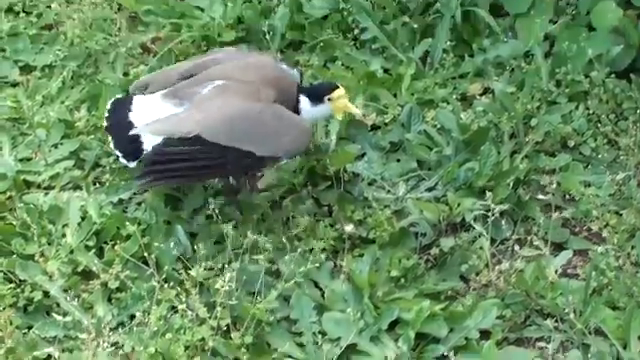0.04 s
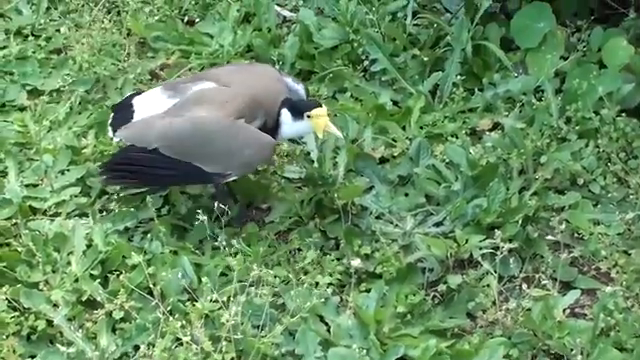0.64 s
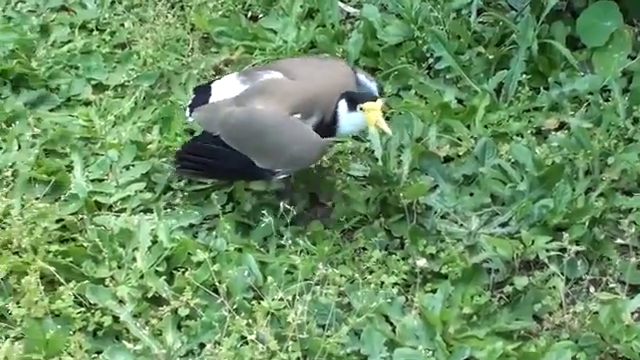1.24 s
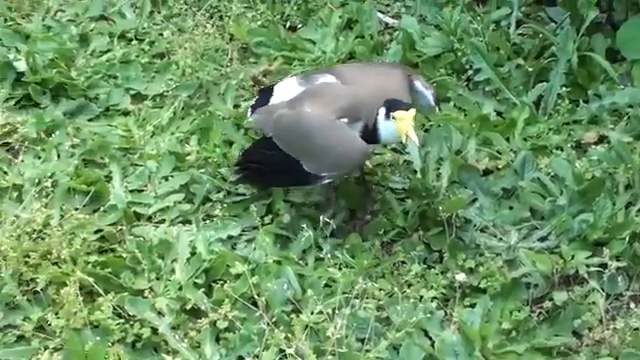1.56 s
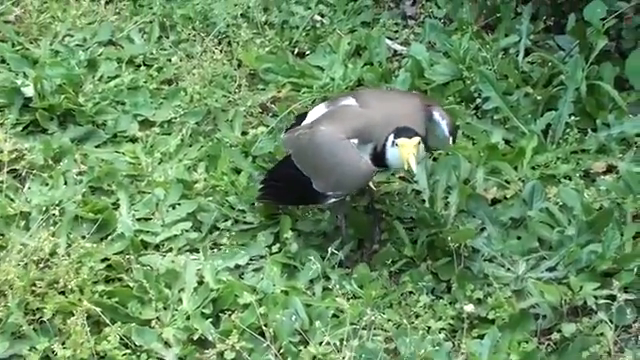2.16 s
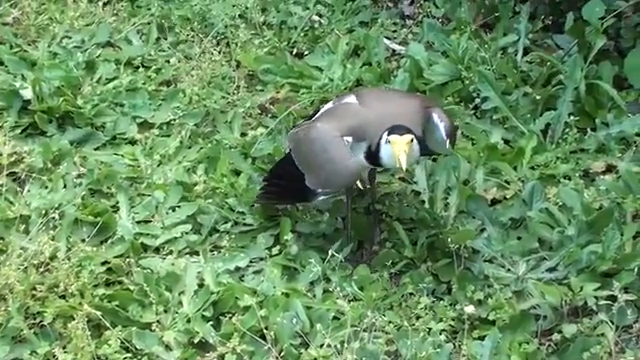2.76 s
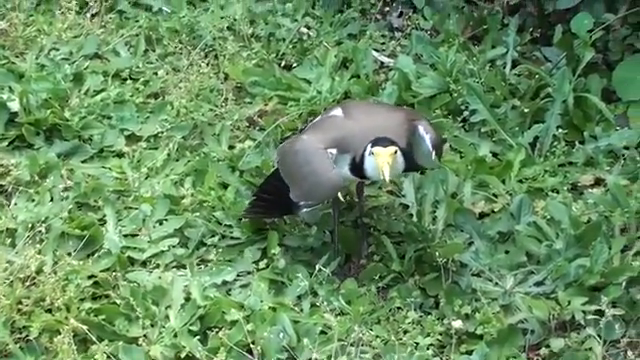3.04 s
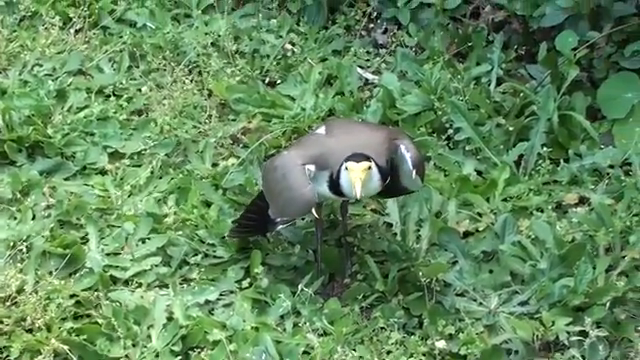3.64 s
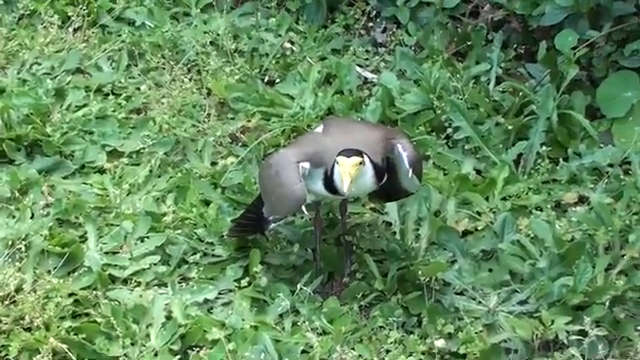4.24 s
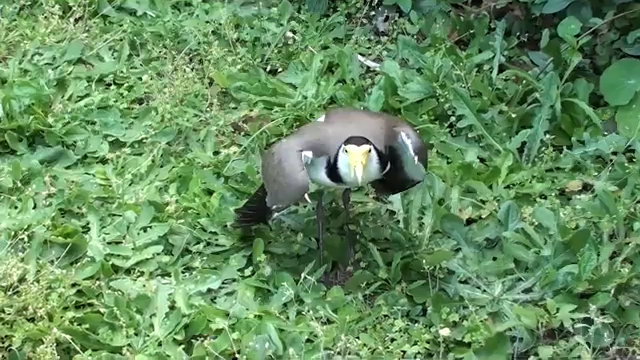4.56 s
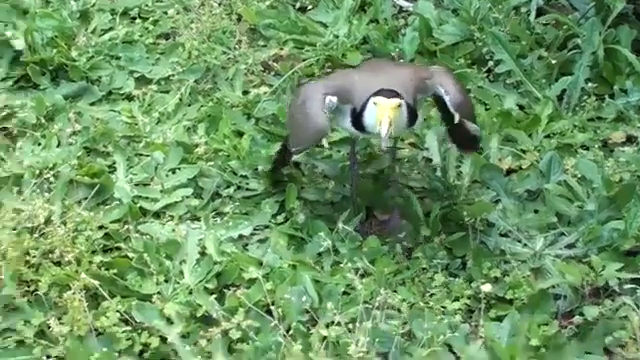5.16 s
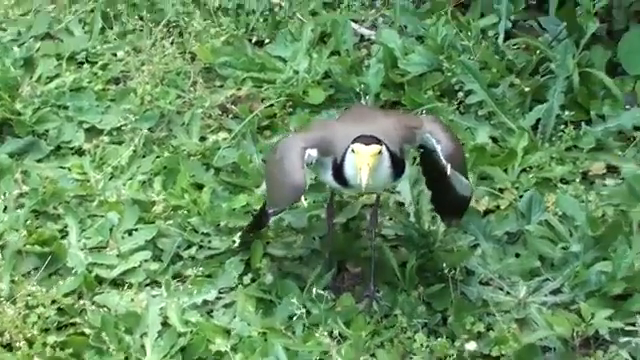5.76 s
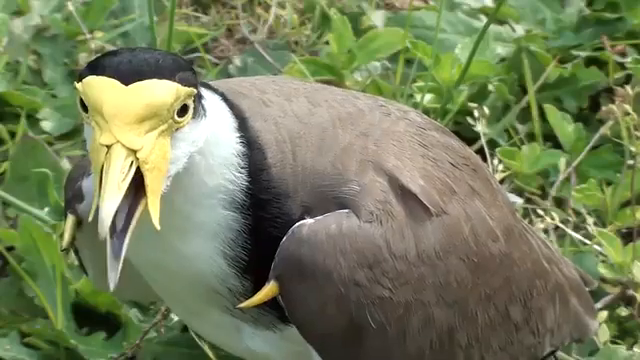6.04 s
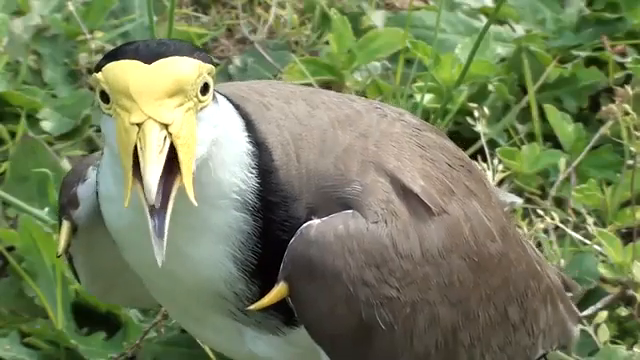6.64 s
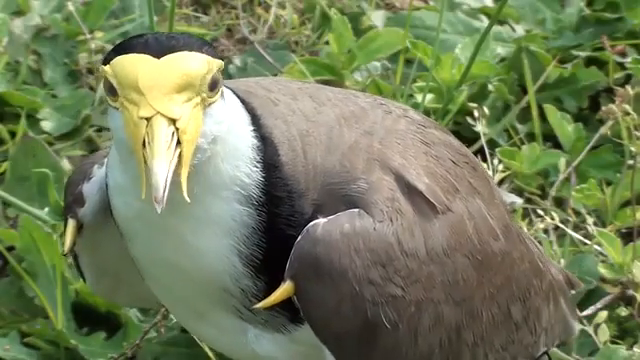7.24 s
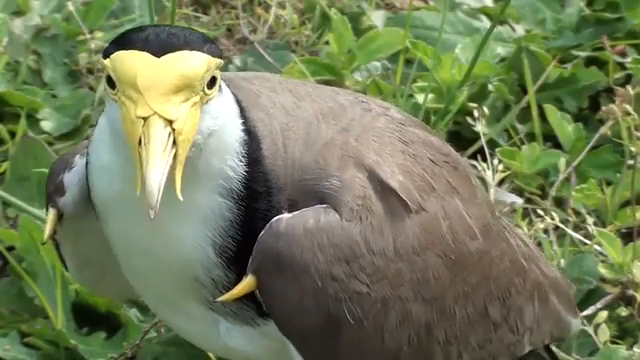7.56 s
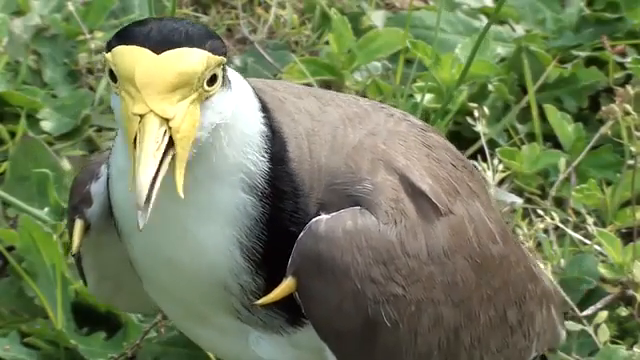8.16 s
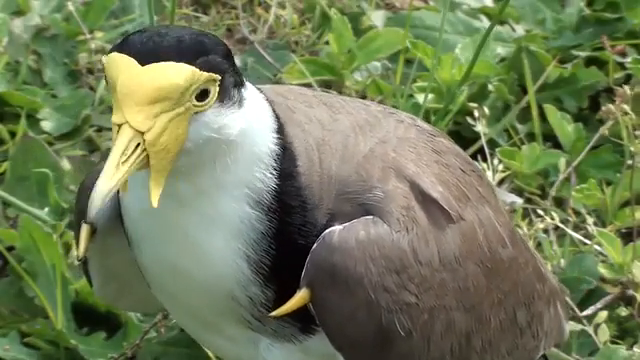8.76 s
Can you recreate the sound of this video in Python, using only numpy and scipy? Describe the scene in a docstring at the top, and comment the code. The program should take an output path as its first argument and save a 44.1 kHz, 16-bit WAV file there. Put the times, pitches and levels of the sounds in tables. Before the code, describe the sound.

A quiet garden hisses softly, with far insects and small birds whistling in the distance. A camera ticks faintly as it focuses, then its zoom motor whirs and leaves rustle. About halfway, a lapwing close to the microphone gives four loud, quick, harsh calls, followed by seven longer ones at uneven gaps. Each echoes briefly, and light puffs of air rumble on the microphone toward the end.

```python
"""A garden: the air hisses and rumbles, far insects buzz, and a camera whines and ticks as it focuses.
Small birds whistle far off. After 3.3 s the zoom motor takes over from the ticking, then leaves rustle.
At 4.7 s a masked lapwing close by on the lawn scolds four times quickly, and from 6.1 s seven times
at more length, while puffs of air hit the microphone. Each call starts with a creak, stutters as
the voice catches, and ends on a clear held note that echoes from the garden."""
import sys
import numpy as np
from scipy import signal
from scipy.fft import rfft, irfft, next_fast_len
from scipy.io import wavfile

SR = 44100
rng = np.random.default_rng(int(sys.argv[2]) if len(sys.argv) > 2 else 0)


def wav_record(signal):
    """Record a signal, one row per channel, as 16-bit PCM in the file named by sys.argv[1]."""
    frames = np.transpose(np.atleast_2d(signal))
    bounded = np.clip(frames, -1, 1)
    # unit amplitude maps onto the largest positive 16-bit level
    quanta = np.round(bounded * 32767).astype(np.int16)
    wavfile.write(sys.argv[1], SR, quanta)


N = 387638
TIME = np.arange(N) / SR
CALL_SIZE = 8192   # samples set aside for one call


def from_db(db):
    """Turn decibels into a number to multiply a sound by."""
    return 10 ** (np.asarray(db) / 20)


def rms(x):
    """The average strength of a sound (root mean square)."""
    return np.sqrt(np.mean(x ** 2) + 1e-20)


def level(rows):
    """A volume curve through rows of (time [s], level [dB])."""
    return from_db(np.interp(TIME, *np.transpose(rows)))


def at_hz(points, hz):
    """Look up a frequency in a table, with octaves evenly spaced."""
    points = np.array(points)
    return np.interp(np.log(np.maximum(hz, 1)), np.log(points[:, 0]), points[:, 1])


def bins(size):
    """The frequencies that rfft splits a sound into."""
    return np.arange(size // 2 + 1) * SR / size


def wander(rate_hz, size):
    """A smooth random wobble of strength 1."""
    x = irfft(rfft(rng.standard_normal(size)) / (1 + (bins(size) / rate_hz) ** 2), size)
    return x / rms(x)


# How alike the two ears' noise is: (frequency [Hz], likeness [0 to 1])
EAR_LIKENESS = [(30, 0.82), (125, 1), (250, 0.83), (600, 0.89), (2000, 0.8), (8000, 1), (15000, 1)]
def stereo_noise(tone):
    """Noise of strength 1, mostly alike in both ears; tone sets the balance of low and high."""
    size = next_fast_len(N)
    hz = bins(size)
    alike = np.clip(at_hz(EAR_LIKENESS, hz), 0, 1)
    mid, side = rfft(rng.standard_normal((2, size))) * from_db(at_hz(tone, hz))
    x = irfft(np.sqrt(1 + alike) * mid + np.sqrt(1 - alike) * side * [[1], [-1]], size)[:, :N]
    return x / rms(x)


# Tone of still air: (frequency [Hz], relative level [dB])
AIR_TONE = [(30, -20.5), (55, -10), (90, 3.5), (130, 3.5), (260, -4.5), (480, -2), (850, -1.5),
            (1100, -5.5), (1250, -9.5), (2500, -14.5), (5000, -17), (8000, -19.5), (11500, -24.5),
            (15800, -25.5)]
# Its loudness: (time [s], level [dB])
AIR_LEVEL = [(0, -46), (4.68, -46), (4.76, -55), (5.25, -54.5), (5.94, -50.5), (5.98, -57), (7.2, -58),
             (7.9, -55), (8.79, -57.5)]
def air_and_whine(whine_hz=14998, whine_db=-22):
    """Still air hisses; the camera's thin whistle rises and falls with it, 22 dB weaker."""
    whine = from_db(whine_db) * np.sqrt(2) * np.sin(2 * np.pi * whine_hz * TIME)
    return level(AIR_LEVEL) * (stereo_noise(AIR_TONE) + whine)


# Tone of air on the microphone: (frequency [Hz], relative level [dB])
RUMBLE_TONE = [(20, -16.5), (50, -5), (90, 4), (160, 0.5), (260, -8.5), (400, -24), (900, -42)]
def rumble():
    """Air rumbles unevenly on the microphone: a faint draught, later joined by puffs."""
    strength = from_db(-67) + gusts()
    return strength * stereo_noise(RUMBLE_TONE) * from_db(3.0 * wander(15, N) - 1.5)


# Tone of far insects: (frequency [Hz], relative level [dB])
INSECT_TONE = [(3500, -45), (4800, -14), (5130, 0), (5450, -14), (7000, -45)]
# Their loudness: (time [s], level [dB])
INSECT_LEVEL = [(0, -67), (3.3, -64.5), (4.7, -68), (4.8, -80), (8.79, -80)]
def insects():
    """Far insects blend into one thin, high buzz."""
    return level(INSECT_LEVEL) * stereo_noise(INSECT_TONE)


# Ringing notes of the lens barrel: (pitch [Hz], kick strength [dB], time to fade by 60 dB [s])
BARREL_NOTES = [(1120, -45.3, .085), (835, -51.5, .07), (765, -51.5, .07)]
def focus_motor(steps_per_s=19.03, stop_s=3.36, uneven_db=1.2):
    """Each step of the lens kicks its barrel, which rings briefly."""
    steps = (np.arange(.03, stop_s, 1 / steps_per_s) * SR).astype(int)
    out, t = np.zeros(N), np.arange(SR // 5) / SR
    for hz, db, fade_s in BARREL_NOTES:
        kicks = np.zeros(N)
        kicks[steps] = from_db(db + uneven_db * rng.standard_normal(len(steps)))
        ring = np.sin(2 * np.pi * hz * t) * from_db(-60 * t / fade_s) * 2 * (1 - np.exp(-t / .0068))
        out += signal.fftconvolve(kicks, ring)[:N]
    return out


def chirp(start, length, db, first_hz, last_hz, warble, flutter_db=3.0):
    """One small bird's sliding note, wobbling in pitch and loudness."""
    out, size, i = np.zeros(N), int(length * SR), int(start * SR)
    hz = np.linspace(first_hz, last_hz, size) * (1 + 2 * warble * wander(120, CALL_SIZE * 4)[:size])
    shape = np.sqrt(np.hanning(size)) * from_db(flutter_db * wander(50, CALL_SIZE * 4)[:size])
    out[i:i + size] = from_db(db) * shape / rms(shape) * np.sin(2 * np.pi * np.cumsum(hz) / SR)
    return out


# One bird's plain, sinking whistles: (time [s], length [s], level [dB])
WHISTLES = [(.34, .12, -58), (1.44, .08, -61), (1.712, .14, -59), (3.218, .077, -55)]
# Another's upward slide, paired with a higher, sinking note:
# (time [s], length [s], level [dB], delay of the high note [s])
NOTE_PAIRS = [(.716, .055, -53, .235), (1.868, .075, -52.5, -.03), (1.966, .078, -53, -.01),
              (2.84, .165, -52.5, -.075), (3.77, .13, -49.5, .05), (5.69, .12, -58, .06)]
def songbirds(twitters=11, twitters_until_s=4.5, echo_db=1.3):
    """Two far birds repeat their notes among faint random twitters, all blurred by echo."""
    out = sum(chirp(start, length, db, 2130, 2040, warble=.003) for start, length, db in WHISTLES)
    for start, length, db, delay in NOTE_PAIRS:
        out += chirp(start, length, db, 3030, 3780, warble=.022)
        out += chirp(start + delay, length, db - 1, 4380, 4220, warble=.015)
    for when, height, slope in rng.random((twitters, 3)):
        first_hz = 2900 * (5000 / 2900) ** height
        last_hz = first_hz * (1 + .05 * (2 * slope - 1))
        out += chirp(when * twitters_until_s, .08, -62, first_hz, last_hz, warble=.012)
    return out + from_db(echo_db) * garden_echo(out)


# Tone of the garden's echo: (frequency [Hz], relative level [dB])
ECHO_TONE = [(500, -16), (1100, -11), (2100, 0.5), (2650, -3), (3200, -1.5), (4300, -1), (5400, 1),
             (6500, 1), (8000, -4), (11000, -10), (16000, -17.5)]
# How long it lasts: (frequency [Hz], time to fade by 60 dB [s])
ECHO_FADE = [(500, .25), (1100, .3), (2100, 0.69), (3100, 0.53), (7000, 0.51), (14000, 0.31)]
def garden_echo(x, width=.2, early_db=5.0, early_s=.042):
    """Sound bounces off ground, shrubs and fences; the middle pitches linger longest."""
    t = np.arange(SR) / SR
    noise, echo = rfft(rng.standard_normal((2, SR))), 0
    edges = np.geomspace(300, 17000, 13)
    for low, high in zip(edges, edges[1:]):
        hz = np.sqrt(low * high)
        band = irfft(noise * ((bins(SR) >= low) & (bins(SR) < high)), SR)
        echo = echo + band * from_db(at_hz(ECHO_TONE, hz) - 60 * t / at_hz(ECHO_FADE, hz))
    echo = echo * np.clip(t / .0084, 0, 1) * from_db(early_db * np.exp(-t / early_s)) / np.sqrt(.06 * SR)
    mid, side = signal.fftconvolve(x[None], echo, axes=1)[:, :N]
    return mid + width * side * np.array([[1], [-1]])


# Tone of the zoom motor: (frequency [Hz], relative level [dB])
ZOOM_TONE = [(200, -26), (600, -11.5), (850, 0.5), (1150, 0), (1700, -5), (2200, -7.5), (3200, -8),
             (4600, -13), (6000, -24), (9000, -28.5), (15000, -44.5)]
# Its loudness: (time [s], level [dB])
ZOOM_LEVEL = [(0, -100), (3.33, -100), (3.39, -43), (4.68, -43), (4.76, -50.5), (5.3, -52), (5.94, -49),
              (5.99, -100), (8.79, -100)]
def zoom_motor():
    """The camera's zoom motor whirs faintly, with a slight flutter."""
    return level(ZOOM_LEVEL) * stereo_noise(ZOOM_TONE) * from_db(wander(60, N))


# Tone of leaves: (frequency [Hz], relative level [dB])
LEAF_TONE = [(500, -20.5), (1500, 3), (4000, -3), (8000, -2.5), (11000, -14), (16000, -24.5)]
# Each rustle: (time [s], length [s], level [dB])
RUSTLES = [(4.372, 0.25, -46.5), (4.699, 0.004, -34), (5.613, .006, -51), (5.982, 0.14, -58),
           (7.988, 0.16, -56), (8.375, 0.013, -45), (8.417, .06, -54)]
def leaves(grain_db=3.5):
    """Leaves stir in short, grainy swishes and ticks."""
    swells = sum(from_db(db) * np.sin(np.pi * np.clip((TIME - start) / length, 0, 1))
                 for start, length, db in RUSTLES)
    return swells * from_db(grain_db * wander(120, N)) * stereo_noise(LEAF_TONE)


# The lapwing's calls: (start [s], end of creak [s], start of held note [s], end [s], held pitch [Hz],
# time between catches [s], time for catches to reach full depth [s], held level [dB], echo level [dB])
CALLS = [ (4.716, 4.735, 4.7368, 4.775, 1130, .02, .003, -9, -11),
         (4.832, 4.842, 4.8577, 4.884, 1139, .02, .01, -9.5, -9),
         (4.931, 4.94, 4.9715, 5.002, 1132, .0215, .011, -9.2, -11),
         (5.055, 5.061, 5.0907, 5.120, 1124, .0168, .01, -9.6, -13),
         (6.123, 6.1354, 6.2022, 6.244, 1066, .0102, .062, -10.5, -14.5),
         (6.472, 6.486, 6.555, 6.595, 1070, .0105, .046, -11.5, -14),
         (6.756, 6.763, 6.8165, 6.865, 1068, .0105, .024, -11.5, -13.5),
         (6.981, 6.989, 7.0192, 7.065, 1067, .0105, .02, -10.5, -15),
         (7.418, 7.431, 7.4785, 7.526, 1055, .0103, .035, -10.5, -14.5),
         (8.1315, 8.147, 8.2072, 8.25, 1082, .0107, .054, -11.3, -15.5),
         (8.532, 8.546, 8.6028, 8.64, 1089, .0107, .036, -11.5, -15)]
# Difference between the microphone's left and right openings: (frequency [Hz], relative level [dB])
MIC_DIFFERENCE = [(1000, -29.5), (2500, -27), (5000, -27), (9000, -26.5), (13000, -19)]
def lapwing():
    """The bird scolds from straight ahead, and the garden echoes each call."""
    mid, side, to_garden = np.zeros((3, N + CALL_SIZE))
    difference = from_db(at_hz(MIC_DIFFERENCE, bins(CALL_SIZE)))
    for start, *shape, echo_db in CALLS:
        near, carrying = call(start, *shape)
        near, i = ground_spread(near), int(start * SR)
        mid[i:i + CALL_SIZE] += near
        side[i:i + CALL_SIZE] += irfft(1j * rfft(near) * difference)
        to_garden[i:i + CALL_SIZE] += carrying * from_db(echo_db)
    direct = mid[:N] * from_db([[.1], [-.1]]) + side[:N] * np.array([[1], [-1]])
    return direct + garden_echo(to_garden[:N])


def pulses(cycles, harmonics):
    """One sharp pulse of air for each cycle of the voice."""
    return .5 + np.cos(2 * np.pi * np.arange(1, harmonics + 1)[:, None] * cycles).sum(axis=0)


def throat(x, tone_db):
    """The throat rings after each pulse, never before it (a minimum-phase filter)."""
    cepstrum = irfft(np.log(from_db(tone_db)))
    cepstrum[1:len(x) // 2] *= 2
    cepstrum[len(x) // 2 + 1:] = 0
    return irfft(rfft(x) * np.exp(rfft(cepstrum)))


TONE_PITCH_HZ = 1065   # the next three tables describe a call at this pitch
# Tone of the creak: (frequency [Hz], relative level [dB])
CREAK_TONE = [(100, -43), (380, -27), (920, -18), (1500, -13.5), (1850, 0), (2200, -9.5), (3000, -10),
              (3700, -7), (5300, -16.5), (6600, -25), (8000, -24), (9800, -20), (13000, -35.5),
              (16000, -44)]
# Tone of the four quick calls, sung farther off and facing away: (frequency [Hz], relative level [dB])
QUICK_TONE = [(150, -47), (750, -27.5), (1065, -21.5), (2130, -4), (3200, 0), (4260, 0), (5320, -6.5),
              (6400, -10.5), (7450, -14), (8500, -18.5), (9700, -18.5), (10700, -15), (12800, -26),
              (15500, -37.5)]
# Tone of the throat in the seven longer calls: (frequency [Hz], relative level [dB])
LONG_TONE = [(200, -50), (750, -20.5), (1065, -19), (2130, -2.5), (3200, -1), (4260, -2), (5320, -4.5),
             (6400, -13), (7450, -18), (8500, -16.5), (9700, -11.5), (11600, -16), (13300, -26),
             (15500, -34.5)]
def call(start, creak_end, held_from, end, pitch_hz, spacing, build_s, held_db,
         stutter_db=-10, swell_db=1.7, fall=.093, fall_s=.025, quick_until_s=5.5):
    """A creak, a stutter, then a note that swells and falls. Returns the near sound and what echoes."""
    t, hz = start + np.arange(CALL_SIZE) / SR, bins(CALL_SIZE)
    openness, bend, rough = catches(t, plan_catches(creak_end, held_from, spacing, build_s))
    creaking = np.clip((creak_end - t) / .0017, 0, 1)
    before_note = t < held_from
    held = np.clip((t - held_from) / (end - held_from), 0, 1)

    # The pitch climbs out of the creak, shakes, and falls at the end.
    settled = np.clip(held_from, creak_end + .0045, creak_end + .02)
    rise = np.interp(t, [start, creak_end, creak_end + .0024, settled], [.84, .915, .958, 1])
    falling = np.clip(1 + (t - end) / fall_s, 0, 1) ** 2.75
    rough = rough + .15 * falling   # the note frays as it falls
    shake = (.0015 + .007 * before_note + .025 * rough + .019 * creaking) * wander(520, CALL_SIZE)
    cycles = np.cumsum(pitch_hz * (rise * (1 - fall * falling) + bend + shake)) / SR

    # Breath drives the voice. After a catch, pulses alternate strong and weak, and the air hisses more.
    effort_db = np.where(before_note, stutter_db, held_db + swell_db * (held - .5))
    fade_out = np.sin(np.pi / 2 * np.clip((end - t) / .0071, 0, 1)) ** 2
    uneven = from_db(1.2 * before_note * wander(90, CALL_SIZE))
    flow = from_db(effort_db) * openness * (1 - creaking) * fade_out * uneven
    buzz = pulses(cycles, harmonics=16) * (1 + .44 * rough * np.cos(np.pi * cycles))
    hiss = np.pi * (.022 + .36 * rough) * rng.standard_normal(CALL_SIZE)
    voice = flow * (buzz + hiss * (1 + np.cos(2 * np.pi * cycles)))

    # The throat follows the pitch: higher calls are brighter, and no two are shaped alike.
    tilt_db = 5.0 * np.log2(pitch_hz / TONE_PITCH_HZ) * np.log2(np.maximum(hz, 1000) / 3200)
    scaled_hz = hz * TONE_PITCH_HZ / pitch_hz
    throat_db = at_hz(QUICK_TONE if start < quick_until_s else LONG_TONE, scaled_hz) + tilt_db
    throat_db += np.interp(hz, np.arange(16) * pitch_hz, 1.3 * rng.standard_normal(16))

    # The bill opens wide only for the held note, which is brighter and carries further.
    wide = np.clip((t - held_from) / .0065, 0, 1)
    muffle_db = -3.5 * np.clip(np.log2(scaled_hz / 2200 + 1e-9), 0, 1)
    stutter = throat(voice * (1 - wide), throat_db + muffle_db)
    note = throat(voice * wide, throat_db)
    note *= rms(flow * wide) / rms(note)

    # The creak is separate pulses at half the pitch, growing in strength.
    push_db = stutter_db + np.interp(t, [start, start + .0065, creak_end], [-8, -2, -1])
    push = from_db(push_db) * creaking * np.clip((t - start) / .0008, 0, 1)
    snaps = pulses(cycles / 2 - .2, harmonics=36) * (1 + .25 * wander(400, CALL_SIZE))
    snaps += .9 * rng.standard_normal(CALL_SIZE)
    creak = throat(push * snaps, at_hz(CREAK_TONE, scaled_hz) + tilt_db)

    harsh = stutter * rms(flow * (1 - wide)) / rms(stutter) + creak * rms(push) / rms(creak)
    carry = from_db(-10 * falling)   # the bill closes as the pitch falls
    return harsh + note, from_db(-6) * harsh + carry * note


def ground_spread(x, centre_hz=3600, width_hz=2150):
    """The ground's reflection delays the middle frequencies a little, which spreads each pulse."""
    radius = np.exp(-np.pi * width_hz / SR)
    poles = [1, -2 * radius * np.cos(2 * np.pi * centre_hz / SR), radius * radius]
    return signal.lfilter(poles[::-1], poles, x + 1e-18)


def plan_catches(creak_end, held_from, spacing, build_s, full_db=-17.5, free_s=.008):
    """The voice catches evenly, deeper as strain builds: rows of (time [s], depth [dB], length [s])."""
    times = np.append(held_from, np.arange(held_from - spacing, creak_end + free_s, -spacing))
    strain = np.clip((times - creak_end) / build_s, 0, 1) ** 2
    depth_db = full_db * strain * np.where(times == held_from, .8, 1)   # the last is shallower
    length = .0064 * (spacing / .0105) ** .5 * (.55 + .45 * strain)   # slower catches last longer
    return np.transpose([times, depth_db, length])


def catches(t, plan, swing=.0558, tighten_s=.0046, relax_s=.00322, slip_s=.0007, rough_s=.0025):
    """The voice box tightens until it chokes, then restarts low; deeper catches are rougher."""
    openness, bend, rough = np.ones_like(t), np.zeros_like(t), np.zeros_like(t)
    for when, depth_db, length in plan:
        choke = 1.5 - np.exp(-(depth_db / 11.5) ** 2)
        since = t - when - .00085   # the pitch slips just after the tightest moment
        nearness = np.exp(-np.abs(since) / np.where(since < 0, tighten_s, relax_s))
        openness *= from_db(depth_db * np.exp(-np.abs((t - when) / (.46 * length)) ** 2.6))
        bend -= swing * (1.25 * choke + .15) * np.tanh(since / slip_s) * nearness
        rough += choke * np.exp(-((t - when - .39 * length) / rough_s) ** 2)
    return openness, bend, rough


# Puffs of air on the microphone: (time [s], length [s], strength [dB])
GUSTS = [(5.92, .1, -56), (6.25, .22, -60), (6.64, .08, -50), (7.27, .11, -52), (7.52, .22, -51),
         (7.73, .42, -47.5), (8.28, .28, -41.5), (8.62, .2, -53)]
def gusts(rise_s=.025, fall_s=.04):
    """A volume curve for the rumble: each puff of air rises, holds and falls."""
    return sum(
        from_db(db) * np.clip(np.minimum((TIME - start) / rise_s, (start + length - TIME) / fall_s), 0, 1)
        for start, length, db in GUSTS)


def scene():
    """The lapwing over the quiet garden and the camera's own noises."""
    background = air_and_whine() + zoom_motor() + rumble()
    return background + lapwing() + songbirds() + leaves() + focus_motor() + insects()


def record(dry, ceiling=.91, cutoff_hz=15900):
    """Round off the tallest peaks and cut the very highest treble."""
    rounded = dry / (1 + (dry / ceiling) ** 8) ** (1 / 8)
    return signal.sosfilt(signal.ellip(10, .1, 80, cutoff_hz, fs=SR, output="sos"), rounded)


dry = scene()
out = record(dry)
wav_record(out)
```